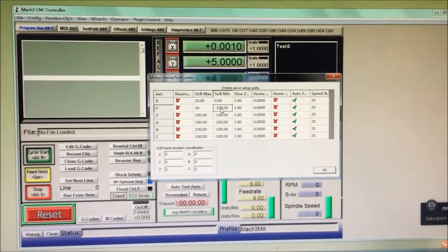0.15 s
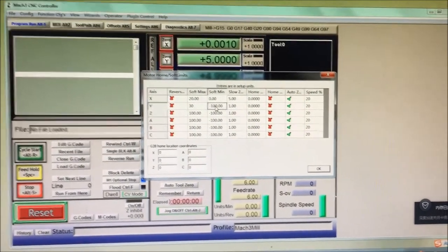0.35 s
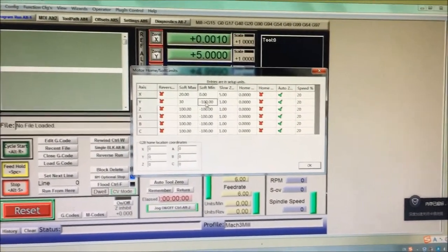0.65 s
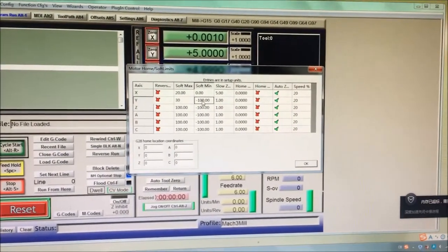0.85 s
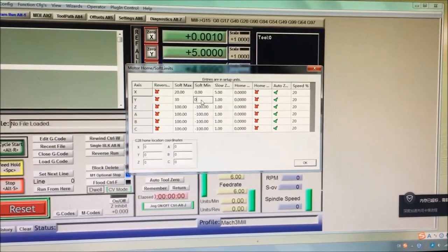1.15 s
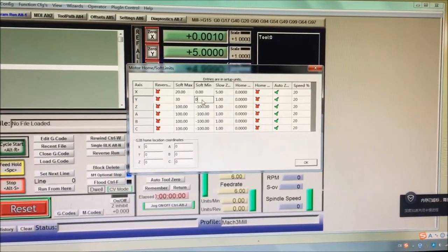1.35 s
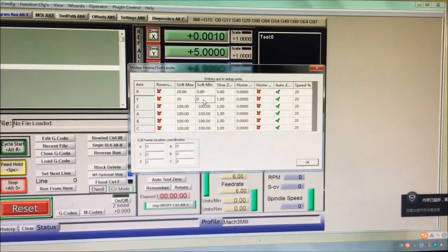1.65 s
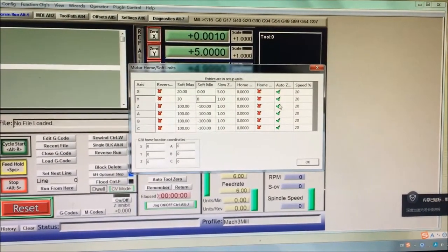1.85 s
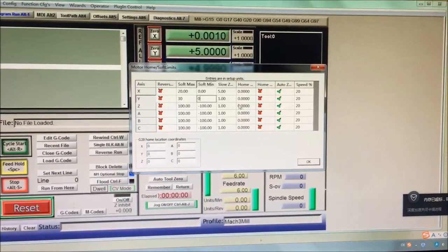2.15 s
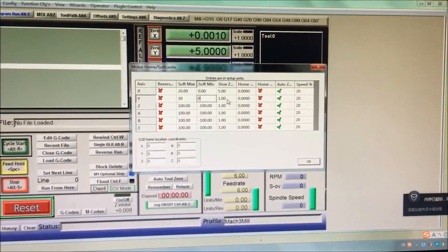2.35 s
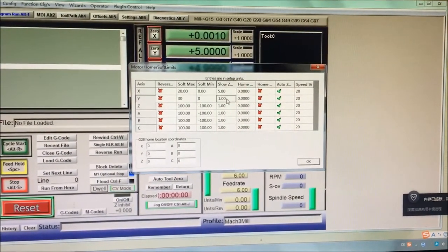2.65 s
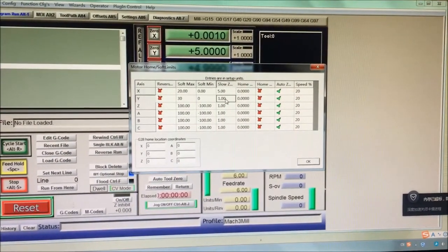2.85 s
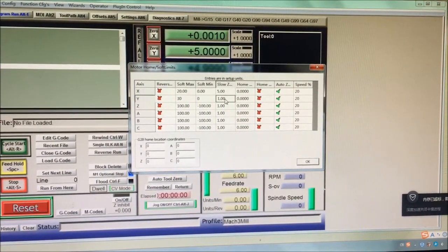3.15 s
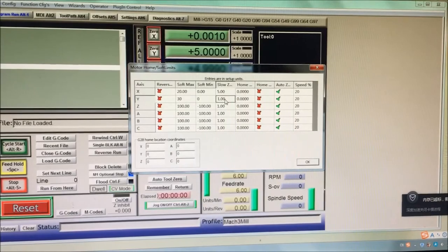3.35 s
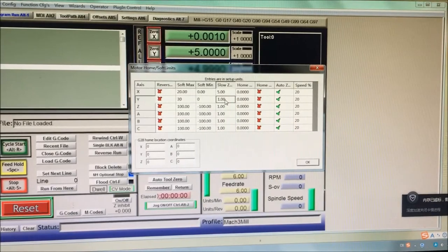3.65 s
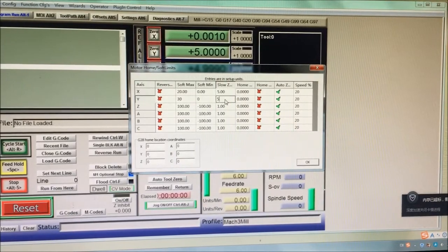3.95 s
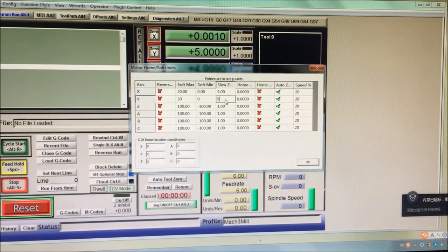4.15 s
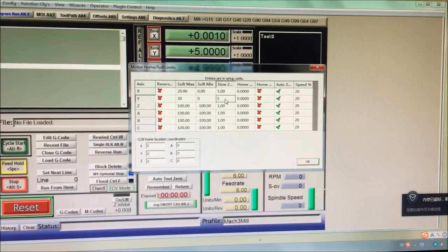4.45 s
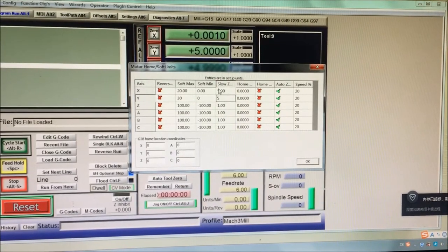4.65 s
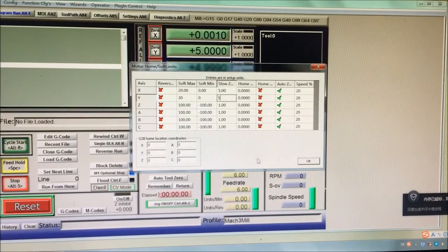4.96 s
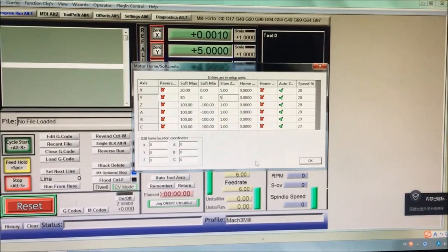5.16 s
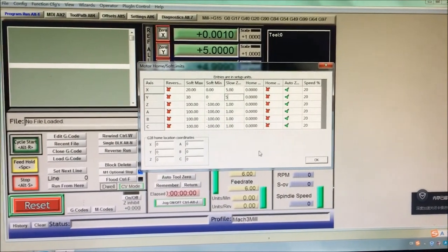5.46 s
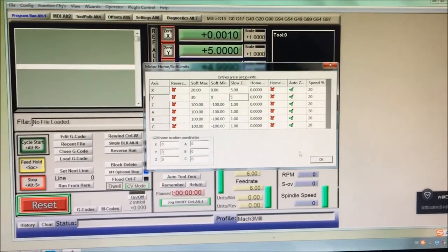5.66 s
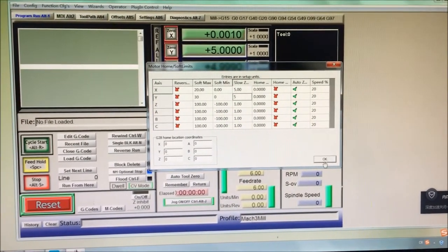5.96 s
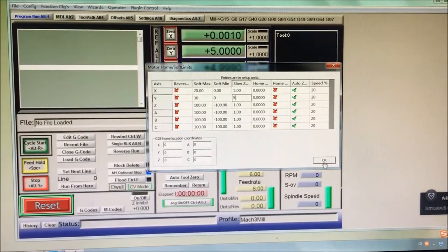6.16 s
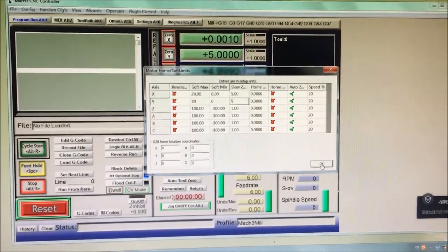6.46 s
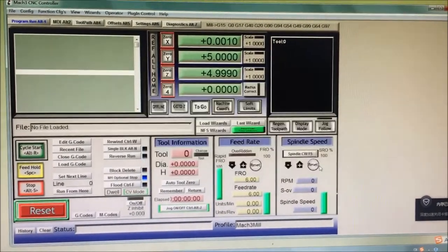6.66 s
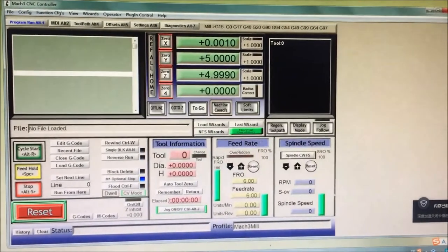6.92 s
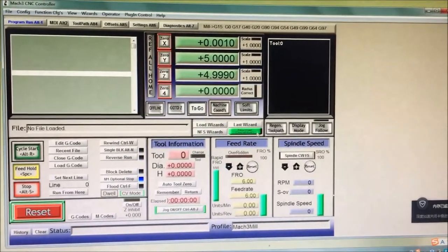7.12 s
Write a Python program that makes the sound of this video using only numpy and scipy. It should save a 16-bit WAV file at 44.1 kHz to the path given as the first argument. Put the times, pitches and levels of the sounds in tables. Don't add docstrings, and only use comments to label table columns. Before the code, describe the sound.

In a quiet room, close to a desk, a mouse button releases with a tiny tick. A crisp clicky key is pressed and springs back, then a mouse click follows. A second, larger and slightly lower key clacks, and the mouse is nudged and set down with a light knock. Two more separate mouse clicks end it, over soft sleeve rubbing, faint computer hum and hiss.

```python
import sys
import numpy as np
from scipy import signal
from scipy.fft import rfft, irfft, next_fast_len
from scipy.io import wavfile
from scipy.ndimage import uniform_filter1d

SR = 44100
rng = np.random.default_rng(int(sys.argv[2]) if len(sys.argv) > 2 else 0)


def gain_from_decibels(decibels):
    exponent = np.asarray(decibels, float) / 20
    return 10 ** exponent


def wav_record(signal):
    frames = np.transpose(np.atleast_2d(signal))
    bounded = np.clip(frames, -1, 1)
    quanta = np.round(bounded * 32767).astype(np.int16)
    wavfile.write(sys.argv[1], SR, quanta)


N = 321489

# start in seconds, peak in dB,
# case ring in dB re peak, desk thud in dB re peak, brightness in dB per octave.
KEY_SNAPS = [
    (1.0816, -14.5, -20, -27.5, 4),
    (3.8906, -15.5, -21, -28, .5),
]
KEY_BOTTOMS = [
    (1.1128, -14, -12.5, -23, -.5),
    (3.9152, -13.5, -15, -21.5, -.5),
]
KEY_RETURNS = [
    (1.194, -15.5, -12.5, -31, 0.1),
    (4.0256, -15.5, -13.5, -30, 0.1),
]
MOUSE_CLACK = [
    (4.8686, -21, -17, -26, 1.5),
]
MOUSE_NUDGES = [
    (0.075, -57, -18, -17, 0.5),
    (0.176, -53, -20, -15, 0.5),
    (3.847, -47.5, -24, -13, 0.5),
    (4.595, -32.5, -14, -21, 0.5),
    (4.632, -36, -13.5, -8.5, 0.55),
]
# start in seconds, peak in dB, shell in dB re peak, brightness in dB per octave.
SWITCH_PRESSES = [
    (2.6533, -29, -20, -2),
    (5.488, -28.5, -21, -6),
    (6.4969, -29.5, -20, -8.5),
]
SWITCH_RELEASES = [
    (0.0187, -26.5, -17, 0.1),
    (2.801, -25.5, -19, 0.1),
    (5.57, -25.5, -16.5, 0.1),
    (6.6303, -28, -15, 0.1),
]
# start in seconds, frequency in Hz, level in dB, T60 in seconds.
SPRING_TONES = [
    (1.2, 902, -53.5, 1.55),
    (4.029, 990, -60, 0.82),
    (4.032, 1770, -57, .5),
]
# end in seconds, length in seconds, centre in Hz, width in Hz, level in dB.
PLASTIC_SLIDES = [(1.187, 0.012, 7200, 2000, -60), (1.194, 0.011, 3000, 900, -60.5),
                  (2.78, 0.11, 3350, 690, -71), (3.891, 0.012, 3000, 540, -57),
                  (4.026, 0.007, 3100, 500, -46), (3.7, .02, 9000, 6000, -62),
                  (4.328, 0.052, 1280, 320, -66), (1.745, 0.023, 920, 500, -61),
                  (3.038, 0.02, 1000, 1500, -62), (5.425, 0.018, 886, 130, -61),
                  (3.645, .012, 11700, 900, -67), (4.869, 0.014, 1930, 790, -55),
                  (3.56, 0.12, 3020, 1800, -69), (3.68, .11, 2000, 930, -70)]
# start in seconds, peak in dB, pitch in Hz, T60 in seconds.
ARM_BUMPS = [(.3, -49, 186, 0.069), (.302, -54.5, 412, 0.039), (3.028, -49, 208, 0.11),
             (3.028, -50, 328, 0.06), (3.058, -48, 148.8, .05), (3.08, -43.5, 149, 0.031),
             (4.602, -48.5, 197, 0.12), (5.63, -54, 178, 0.065), (6.377, -47.5, 150, 0.12),
             (6.391, -40.5, 170, 0.023), (6.978, -42.5, 170, 0.046)]
# full speed reached in seconds, time held in seconds, level in dB,
# gathering rate in dB per s, slowing rate in dB per s.
SLEEVE_STROKES = [
    (.27, 0.086, -74, 80, 26),
    (.64, .02, -60.5, 110, 31.5),
    (1.33, 0.019, -57.5, 120, 68.5),
    (1.72, .02, -72.5, 82, 62),
    (2.02, .02, -72.5, 200, 90),
    (3.2, .18, -60, 132, 37),
    (4.22, .11, -57.5, 73, 140),
    (4.58, 0.12, -63.5, 90, 152),
    (4.82, .05, -70, 40, 60),
]

# centre in Hz, width in Hz, level in dB.
SNAP_MODES = [(2630, 530, 8.5), (3600, 390, 1.5), (3950, 310, 1), (5670, 640, 0), (6430, 380, 4.5),
              (7480, 360, 4), (8750, 490, 0), (11700, 580, -19), (14900, 900, -19.5), (6000, 11000, -7)]
BOTTOM_MODES = [(2540, 1500, -1), (2980, 1110, 19.5), (4160, 900, -9.5), (6100, 2500, -4), (8600, 900, -15),
                (9000, 9000, -12)]
RETURN_MODES = [(2720, 290, 1.5), (2940, 770, -4.5), (3210, 290, 1), (5440, 380, -11), (5850, 450, -14),
                (7430, 220, -11), (8560, 630, -24), (12800, 470, -77), (8000, 4900, -33)]
LARGE_RETURN_MODES = [(2400, 500, 2), (2800, 450, -2), (3350, 290, -1), (5150, 300, -11.5),
                      (5650, 410, -11), (6780, 390, -11.5), (8490, 140, -4), (12000, 1450, -23.5),
                      (14200, 1400, -21), (8000, 5400, -26)]
CLACK_MODES = [(1130, 630, -3), (1710, 170, -1), (2050, 420, 9), (2950, 900, -32), (4420, 830, -0.5),
               (6000, 730, 0.5), (7050, 650, -2.5), (9130, 760, -4.5), (11900, 870, -9),
               (6030, 7800, -13.5)]
NUDGE_MODES = [(990, 350, 11), (1650, 300, -21), (2600, 540, 0), (3600, 500, -25)]
PRESS_MODES = [(5100, 500, -10), (6740, 360, 8), (7130, 280, 11.5), (8870, 370, -16.5), (9700, 400, 4),
               (11100, 260, 8), (12100, 810, 11.5), (13000, 270, -13), (14500, 470, 7), (11200, 6600, 2.5)]
RELEASE_MODES = [(6120, 210, -11), (6790, 230, 8), (8770, 400, -8), (8720, 210, 1.5), (10720, 480, -3.5),
                 (11000, 200, 0.5), (12460, 440, -5), (13900, 300, -25), (14300, 760, -1.5),
                 (11500, 3700, -28)]
SHELL_MODES = [(880, 91, -9), (2010, 300, -7), (2670, 130, -10), (3940, 450, -4.5)]
MOUSE_CASE_MODES = [(970, 120, 2), (1340, 150, -3.5), (1720, 220, 1.5), (2070, 210, -5), (2500, 170, -5.5),
                    (3320, 300, -4.5), (4700, 500, -0.5), (5850, 700, 0.5)]
DESK_MODES = [(55, 13, 1.5), (94, 16, 2), (323, 13, -13), (450, 55, -22)]
# centre in Hz, width in Hz, level in dB.
KEY_CASE_MODES = [
    [(455, 71, -16.5), (640, 97, -15), (800, 120, -13.5), (966, 85, -0.5), (1290, 88, -3), (1406, 58, 1.5),
     (1535, 70, 1), (1880, 77, 1.5), (2140, 60, -8.5), (2430, 60, -10), (2870, 75, -12.5),
     (3270, 70, -13.5)],
    [(445, 66, -22), (625, 74, -14), (820, 75, -20), (940, 56, -16), (1060, 40, 3), (1340, 55, 0.5),
     (1430, 48, -2.5), (1525, 53, -3), (1820, 60, -7.5), (2220, 90, -7), (2495, 150, -11), (2812, 60, -20),
     (3430, 81, -5.5)],
]
CAP_PITCH = [0.98, .92]
COMMON_PITCH = [0.995]
CASE_DAMPING = 1.8

# frequency in Hz, level in dB per Hz.
CLOTH_SPECTRUM = [(530, -6.5), (900, 0), (1280, 1), (1720, -2.5), (3150, 0), (3770, -2.5), (4570, 1.5),
                  (4980, -5), (5280, 2.5), (6480, 2), (7860, 1.5), (9770, 0), (10400, -1), (13000, 0),
                  (16000, -8.5)]
AIR_SPECTRUM = [(190, -38), (330, -5), (470, -10), (599, -1.5), (715, -7.5), (840, -7), (1220, -10),
                (1500, -5), (1600, -11.5), (1790, -10), (2950, -14), (4070, -18), (10400, -18),
                (12600, -16), (15500, -20.5)]
FAN_SPECTRUM = [(15, -31), (25, -2), (96, -3), (172, -6), (208, 0.5), (233, -13.5), (298, -9.5), (360, -36),
                (470, -63.5), (790, -120)]
AIR_DB, FANS_DB = -67, -63.5
# centre in Hz, width in Hz, level in dB.
HUM_TONES = [(50.7, 7, -65), (69, 13, -81.5), (87.9, 10.6, -63.5), (144.8, 25.4, -68), (207.7, 9.6, -68),
             (308.4, 5.8, -79.5), (612, 15, -80.5), (1292, 5.8, -81.5), (1574, 120, -80)]
WHINE_HZ, WHINE_DB = 1635, -78.5

# frequency in Hz, T60 in seconds.
ROOM_T60 = [(200, 0.75), (1000, 0.4), (3000, 0.18), (6000, 0.17), (16000, 0.25)]
# delay in seconds, level in dB.
WALL_ECHOES = [(.0035, -16.5), (0.0106, -23.5), (.024, -26)]
# centre in Hz, width in Hz, depth in dB.
PORT_SHADOWS = [(4860, 430, -2.5), (7680, 460, -3.5), (10500, 290, -4)]
MIC_LOW_HZ, MIC_HIGH_HZ = 37, 15750


def unit(x):
    return x / np.sqrt(np.mean(x ** 2) + 1e-20)


def along(points, hz):
    f, v = np.transpose(points)
    return np.interp(np.log(hz + 1), np.log(f + 1), v)


def filtered(x, response):
    m = next_fast_len(x.shape[-1] + 8192)
    spectrum = rfft(x, m) * response(np.fft.rfftfreq(m, 1 / SR))
    return irfft(spectrum, m)[..., :x.shape[-1]]


def body(modes, shake_db=0):
    gains = [gain_from_decibels(db + shake_db * rng.standard_normal()) for _, _, db in modes]

    def response(f):
        total = 0
        for k, (centre, width, _) in enumerate(modes):
            damping = 1j * f * width
            sign = (-1) ** k
            total = total + sign * gains[k] * damping / (centre * centre - f * f + damping)
        return total
    return response


def rush(spectrum, patchy_db):
    z = signal.stft(rng.standard_normal(N + 512), nperseg=512)[2]
    field = uniform_filter1d(rng.standard_normal(z.shape), 6, 0)
    field = uniform_filter1d(field, 12, 1)
    noise = signal.istft(z * gain_from_decibels(patchy_db * unit(field)), nperseg=512)[1][:N]
    return unit(filtered(noise, lambda hz: gain_from_decibels(along(spectrum, hz))))


def ring(modes, rise, chatter, blow, tilt_db=0, shake_db=1.3, order=1, pitch=1):
    t = np.arange(SR // 4) / SR
    force = rng.standard_normal(len(t)) * (1 - np.exp(-t / rise)) * gain_from_decibels(-60 * t / chatter)
    force[round(rise * SR)] += blow
    lumps = rfft(force)
    colour = np.sqrt(uniform_filter1d(np.abs(lumps) ** 2, size=120))
    force = irfft(lumps / colour, len(t))
    tilted = [(hz * pitch, w, db + tilt_db * np.log2(hz / 3000)) for hz, w, db in modes]
    response = body(tilted, shake_db)
    sound = filtered(force * (t < .15), lambda hz: response(hz) ** order)
    return sound / np.sqrt(4 * uniform_filter1d(sound ** 2, size=90).max())


def add(out, s, x):
    out[round(s * SR):][:len(x)] += x[:len(out) - round(s * SR)]


def knocks(events, contact, cases, pitches, rise, chatter, blow, order=1):
    out = np.zeros(N)
    for k, (s, db, case_db, thud_db, tilt_db) in enumerate(events):
        pitch = pitches[k % len(pitches)]
        touch = ring(contact, rise, chatter, blow, tilt_db, order=order, pitch=pitch)
        damped_case = np.multiply(cases[k % len(cases)], [1, CASE_DAMPING, 1])
        rattle = ring(damped_case, 0.00195, 0.069, 0.85, shake_db=1.5)
        thud = ring(DESK_MODES, 0.00324, .01, 30)
        add(out, s, gain_from_decibels(db - 1.5) * touch)
        add(out, s, gain_from_decibels(db + case_db + 4.0) * rattle)
        add(out, s, gain_from_decibels(db + thud_db) * thud)
    return out


def keyboard():
    cases = KEY_CASE_MODES
    out = knocks(KEY_SNAPS, SNAP_MODES, cases, COMMON_PITCH, .0003, 0.018, blow=7.8)
    out += knocks(KEY_BOTTOMS, BOTTOM_MODES, cases, CAP_PITCH, .0006, 0.018, blow=12.7, order=2)
    out += knocks(KEY_RETURNS[:1], RETURN_MODES, cases[:1], CAP_PITCH, 0.0005, 0.014, blow=2.8)
    out += knocks(KEY_RETURNS[1:], LARGE_RETURN_MODES, cases[1:], COMMON_PITCH, 0.0005, 0.026, blow=8)
    t = np.arange(2 * SR) / SR
    swell = 1 - np.exp(-t / 0.073)
    for s, hz, db, t60 in SPRING_TONES:
        add(out, s, gain_from_decibels(db - 60 * t / t60) * swell * np.sin(2 * np.pi * hz * t))
    return out


def switch(events, leaf, rise, chatter, blow):
    out = np.zeros(N)
    for s, db, shell_db, tilt_db in events:
        add(out, s, gain_from_decibels(db - 2) * ring(leaf, rise, chatter, blow, tilt_db))
        add(out, s, gain_from_decibels(db + shell_db - 5) * ring(SHELL_MODES, 0.0011, 0.022, 2.7))
    return out


def mouse():
    case = MOUSE_CASE_MODES
    out = knocks(MOUSE_CLACK, CLACK_MODES, [case], COMMON_PITCH, 0.0005, 0.016, blow=4)
    out += knocks(MOUSE_NUDGES, NUDGE_MODES, [case[:6]], COMMON_PITCH, 0.00097, 0.0053, blow=3.1, order=2)
    out += switch(SWITCH_PRESSES, PRESS_MODES, 0.0012, 0.013, blow=3)
    return out + switch(SWITCH_RELEASES, RELEASE_MODES, 0.0012, 0.013, blow=2.2)


def slides():
    out = np.zeros(N)
    for end, length, hz, width, db in PLASTIC_SLIDES:
        u = np.linspace(0, 1, round(length * SR))
        band = body([(hz, width, 0)])
        noise = filtered(rng.standard_normal(SR // 8), lambda f: band(f) ** 2)
        rub = unit(noise)[-len(u):]
        add(out, end - length, gain_from_decibels(db) * rub * np.sin(np.pi * u ** 1.8) ** .8)
    return out


def arm():
    out = np.zeros(N)
    t = np.arange(SR // 4) / SR
    onset = 1 - np.exp(-t / 0.00083)
    for s, db, hz, t60 in ARM_BUMPS:
        add(out, s, gain_from_decibels(db + 4.0 - 60 * t / t60) * onset * np.sin(2 * np.pi * hz * t))
    now = np.arange(N) / SR
    speed = np.zeros(N)
    for s, held, db, rise, fall in SLEEVE_STROKES:
        before, after = np.maximum(s - now, 0), np.maximum(now - s - held, 0)
        speed += gain_from_decibels(db - rise * before - fall * after)
    return out + uniform_filter1d(speed, size=900) * rush(CLOTH_SPECTRUM, patchy_db=0.15)


def computer():
    tones = np.zeros(N)
    for hz, width, db in HUM_TONES:
        tones += gain_from_decibels(db) * unit(filtered(rng.standard_normal(N), body([(hz, width, 0)])))
    tones = filtered(tones, lambda hz: 1 / (1 + (hz / 2500) ** 4))
    drift = np.cumsum(rng.standard_normal(N)) * 0.0093
    whine = gain_from_decibels(WHINE_DB + 4.5) * np.sin(2 * np.pi * WHINE_HZ * np.arange(N) / SR + drift)
    rumble = gain_from_decibels(FANS_DB) * rush(FAN_SPECTRUM, patchy_db=-0.5)
    hiss = gain_from_decibels(AIR_DB) * rush(AIR_SPECTRUM, patchy_db=1.5)
    return tones + whine + rumble + hiss


def walls(x):
    echoes = np.zeros(SR // 20)
    t = np.arange(SR // 200) / SR
    for delay, db in WALL_ECHOES:
        smear = rng.standard_normal(len(t)) * gain_from_decibels(-60 * t / 0.011)
        add(echoes, delay, gain_from_decibels(db) * smear / np.linalg.norm(smear))
    return signal.fftconvolve(x, echoes)[:N]


def room(x):
    out, step = np.zeros(N), SR // 5
    for start in range(0, N, step):
        hz, t, z = signal.stft(rng.standard_normal(SR * 3 // 4), SR, nperseg=256)
        t60 = along(ROOM_T60, hz)[:, None]
        scatter = gain_from_decibels(-60 * t / t60)
        slow = gain_from_decibels(-19.0 - 60 * t / (11.5 * t60))
        tail = signal.istft(z * (scatter + slow), SR, nperseg=256)[1]
        wet = signal.fftconvolve(x[start:start + step], tail / np.linalg.norm(tail))
        add(out, start / SR + .004, wet)
    return out


def scene():
    hits = keyboard() + mouse() + slides()
    echoes = walls(hits) + gain_from_decibels(-16.5) * room(hits)
    return (hits + echoes + arm() + computer())[None]


def low_pass(x):
    return signal.sosfilt(signal.butter(12, 16660, fs=SR, output="sos"), x)


def record(dry):
    def port(f):
        return gain_from_decibels(sum(db / (1 + ((f - hz) / w) ** 2) for hz, w, db in PORT_SHADOWS))
    low = signal.butter(3, MIC_LOW_HZ, "high", fs=SR, output="sos")
    high = signal.ellip(8, .5, 45, MIC_HIGH_HZ, fs=SR, output="sos")
    mix = signal.sosfilt(np.vstack([low, high]), filtered(dry, port))
    return low_pass(mix)


dry = scene()
out = record(dry)
wav_record(out)
```